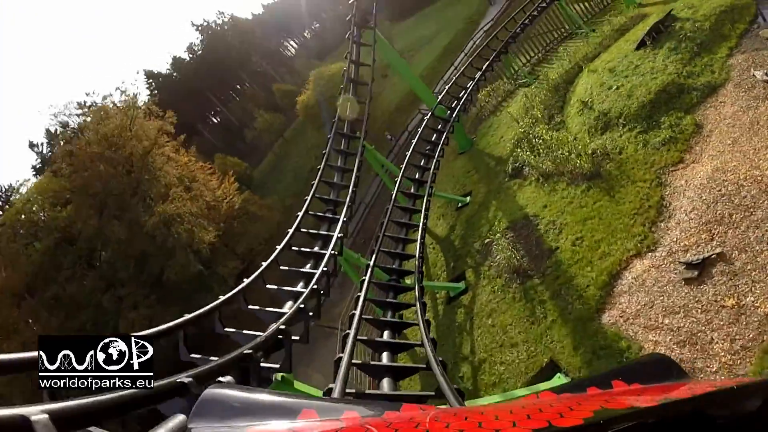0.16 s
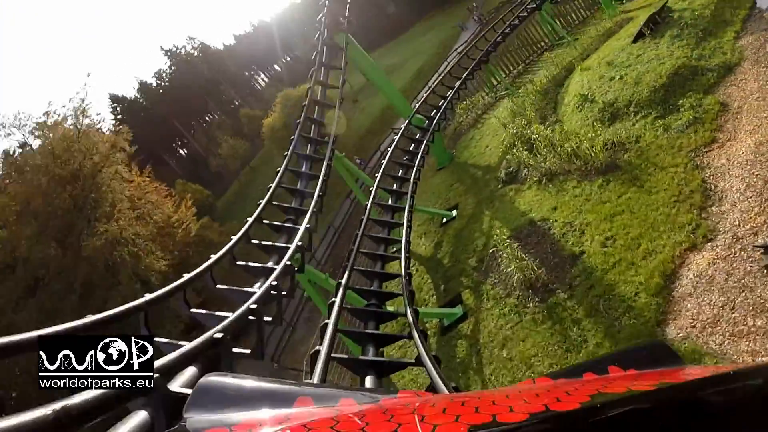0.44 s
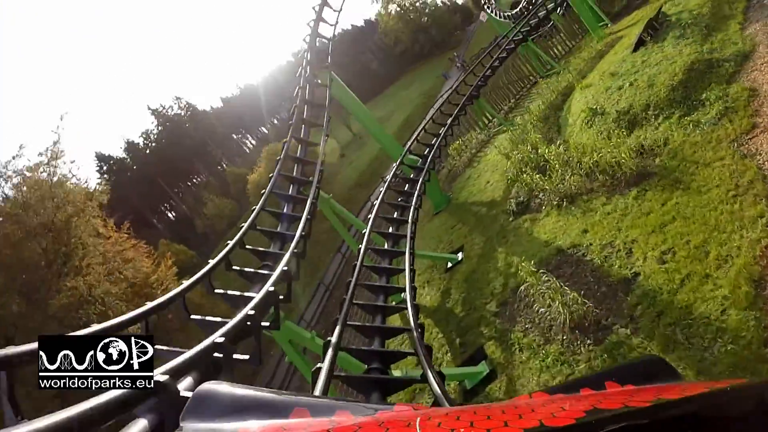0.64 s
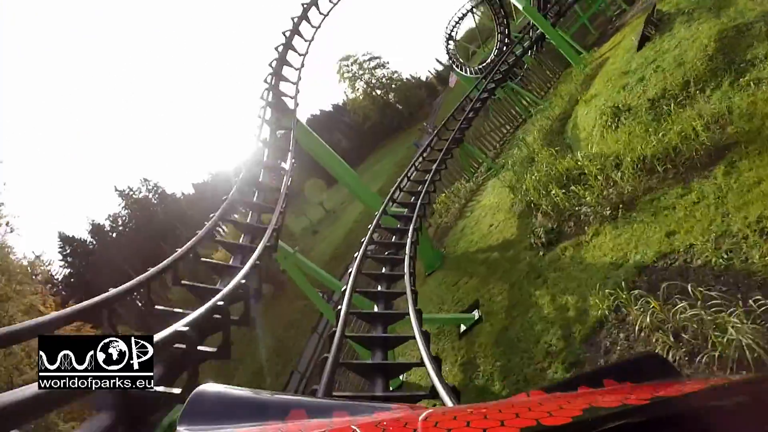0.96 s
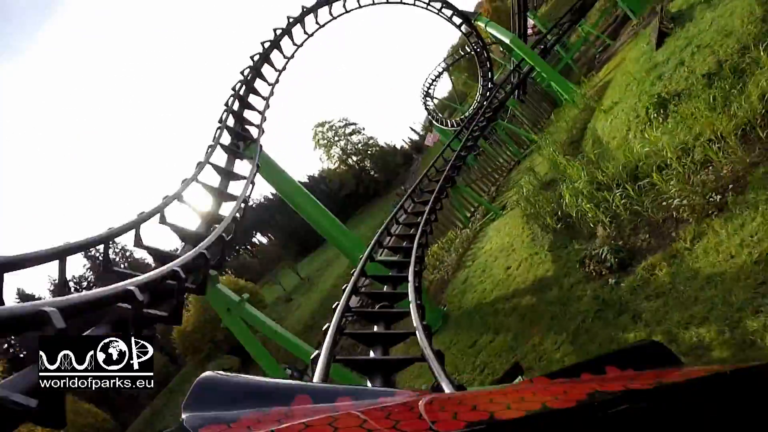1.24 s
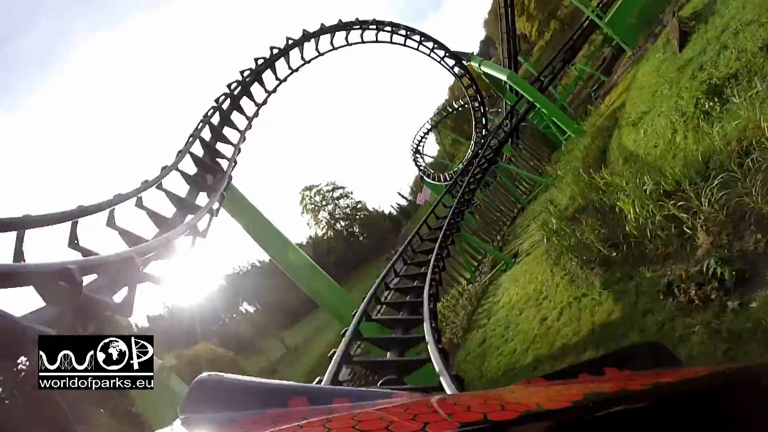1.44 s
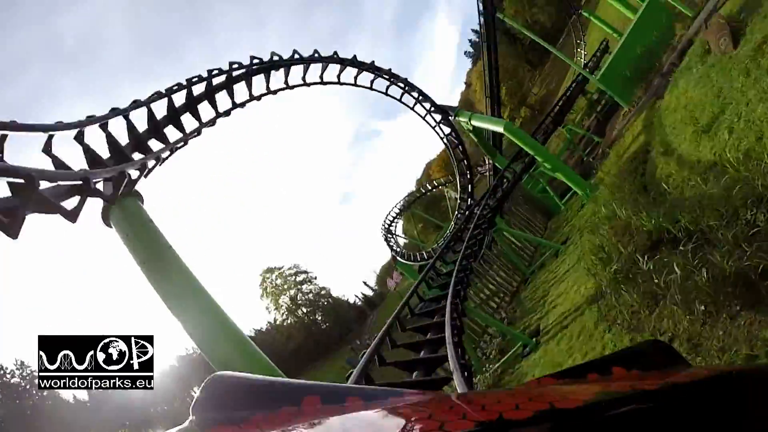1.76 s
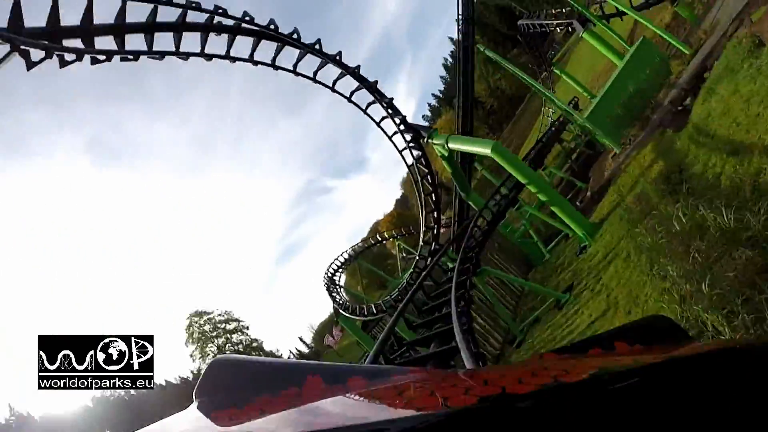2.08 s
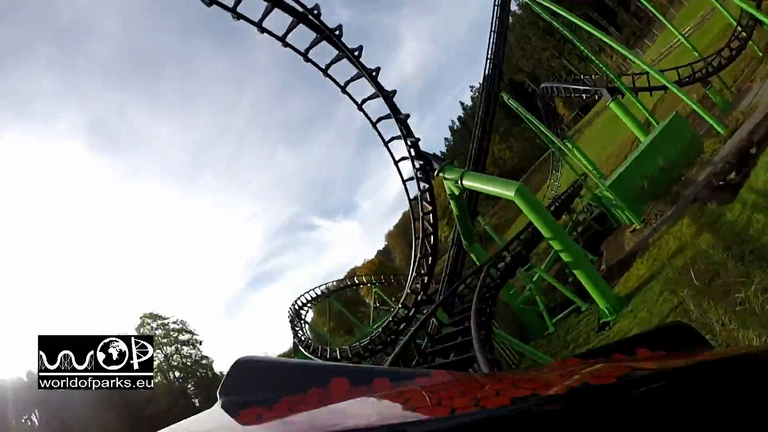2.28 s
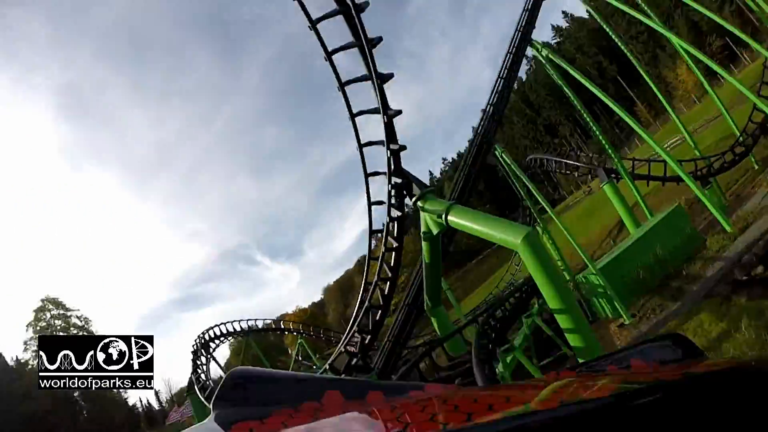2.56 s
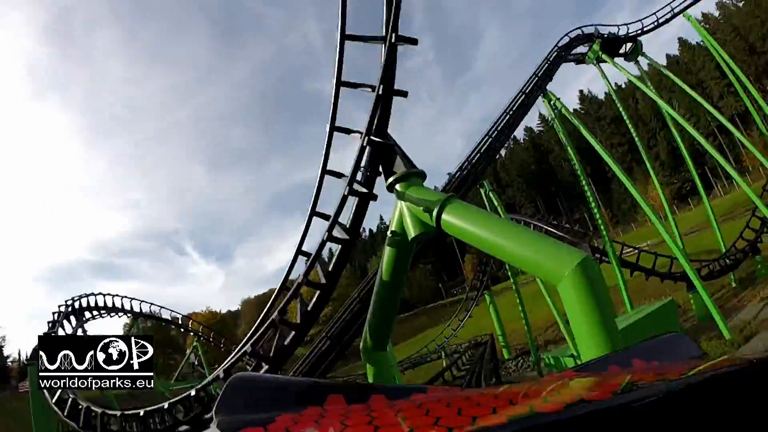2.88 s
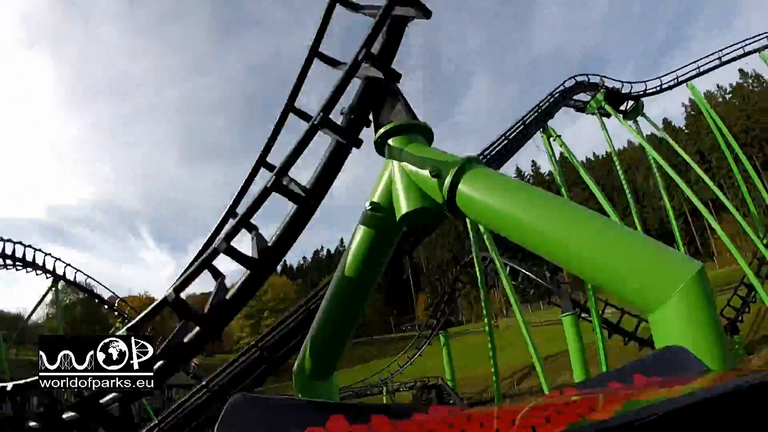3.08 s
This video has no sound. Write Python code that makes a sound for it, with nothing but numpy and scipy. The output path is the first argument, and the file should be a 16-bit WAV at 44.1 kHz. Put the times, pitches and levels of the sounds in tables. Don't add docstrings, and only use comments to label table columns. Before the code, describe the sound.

Close to the rails, a coaster car's wheels roar, tick and clatter under low buffeting wind; the ride grows louder, slams sharply, then a valve hisses behind while booming gusts overload the microphone.

```python
import sys
import numpy as np
from scipy import signal
from scipy.io import wavfile
from scipy.ndimage import uniform_filter1d

SR = 44100
rng = np.random.default_rng(int(sys.argv[2]) if len(sys.argv) > 2 else 0)


def elevation(decibels):
    levels = np.asarray(decibels, float)
    return 10 ** (levels / 20)


def transcribe(signal):
    frames = np.atleast_2d(signal).T
    limited = np.clip(frames, -1, 1)
    pcm = np.round(limited * 32767).astype(np.int16)
    wavfile.write(sys.argv[1], SR, pcm)


N = 142002

# time in seconds, level in dB.
GUST = [(0.0, -23), (0.28, -17.5), (0.35, -25.5), (0.46, -16.5), (0.47, -18.5), (0.91, -24.5), (0.99, -17),
        (1.31, -20), (1.33, -14), (2.35, -22.5), (2.41, -20), (2.45, -22), (2.69, -13), (2.84, -15.5),
        (2.9, -6.5), (3.16, -20), (3.18, -7), (3.22, -26)]
# frequency in Hz, density in dB per Hz.
BUFFET = [(8.8, -12), (15, 2), (49, 1.5), (63, -4.5), (80, -9.5), (90, -12), (120, -74), (200, -120)]
# time in seconds, roar in dB, frame shake in dB, air rush in dB.
LOAD = [(0.0, -55.5, -38.5, 6), (0.39, -53.5, -32, 5), (0.49, -52.5, -34.5, 6), (0.96, -50, -33, 2.5),
        (1.11, -47.5, -33.5, 1), (1.25, -49, -32.5, 2.5), (1.6, -45.5, -28.5, 1.5), (1.71, -46, -28.5, -1),
        (2.16, -46, -31, 0.5), (2.35, -45, -26, -3.5), (2.65, -44, -29, -7), (2.82, -43, -26.5, -20),
        (2.94, -43, -33, -9), (3.22, -48, -24.5, -8)]
# frequency in Hz, density in dB per Hz.
FRAME = [(41, -3), (70, -7), (80, -20.5), (120, -4), (263, -30), (458, -31.5), (538, -33), (958, -41.5),
         (1100, -33), (1430, -89), (2420, -120)]
# frequency in Hz, density in dB per Hz.
ROAR = [(700, -19), (1100, -1.5), (1500, 2.5), (2600, -4.5), (4000, -12.5), (6000, -20.5), (9000, -26),
        (15000, -54)]
# frequency in Hz, level in dB, t60 in seconds.
FITTINGS = [(1347, -1, 0.034), (1447, 5, 0.017), (1700, 3.5, 0.047), (1820, -4, 0.04), (2283, 0.5, 0.011),
            (2530, -14.5, 0.019), (2730, -13, 0.014)]
# peak in seconds, rise in seconds, fall in seconds, level in dB.
JOLTS = [(.015, 0.0083, 0.026, -42), (.445, 0.01, 0.043, -43.5), (1.19, 0.005, 0.083, -52),
         (1.65, 0.016, 0.011, -49.5), (1.885, 0.031, 0.018, -43.5), (2.16, 0.019, 0.067, -43.5),
         (2.505, 0.0038, 0.013, -42), (2.6, 0.0048, 0.0055, -46.5), (2.69, 0.025, 0.015, -44),
         (2.95, 0.0089, 0.022, -56), (3.2, 0.085, 0.013, -42)]
# frequency in Hz, density in dB per Hz.
JOLT_COLOUR = [(100, 25), (300, 16), (800, 3.5), (1500, 7.5), (2900, -2), (3300, -3.5), (6000, -19),
               (14000, -58)]
# peak in seconds, rise in seconds, fall in seconds, level in dB.
SLAM = [
    (2.352, .008, .012, -38),
    (2.37, .012, .015, -34.5),
    (2.388, .008, .025, -34),
    (2.459, .002, .006, -40),
    (.44, .008, .03, -44),
    (.505, .003, .008, -43),
    (3.19, .03, .03, -43),
]
# peak in seconds, rise in seconds, fall in seconds,
# level in dB.
SCUFFS = [
    (2.358, .012, .03, -50),
    (2.1, .02, .015, -63),
    (2.43, .01, .01, -57),
    (2.585, .016, .08, -50),
]
# frequency in Hz, density in dB per Hz.
SCUFF_COLOUR = [(3000, -6), (4000, 0), (6500, 0), (9000, -10), (15000, -22)]
# time in seconds, width in seconds, peak in dB.
SHOVES = [
    (2.4092, .005, -1),
    (.44, .007, -10),
    (2.704, .005, -8),
]
# start in seconds, peak in dB, pitch in Hz.
THUDS = [(0.021, -20, 132), (0.445, -31, 96.9), (0.739, -14, 98), (0.988, -31, 118), (1.189, -16.5, 158),
         (1.37, -16, 116), (1.439, -14, 99), (1.65, -24, 97), (1.718, -16, 95), (1.764, -13.5, 99),
         (1.88, -20, 96), (2.083, -37, 142), (2.158, -15, 121), (2.273, -25, 108), (2.689, -10, 132),
         (2.728, -28, 101), (2.891, -21, 100), (3.03, -8.5, 128), (3.081, -14.5, 123)]
# frequency in Hz, level in dB, t60 in seconds.
KNOCK = [(135, -14, .045), (330, -22, .025), (600, -27, .02), (1650, -27, .02), (2300, -33, .035)]
# start in seconds, peak in dB, brightness in dB.
TICKS = [(0.1433, -35.5, -16), (0.4296, -33, -16), (0.5038, -42, -14), (0.81, -50, -26), (1.887, -41, -13),
         (2.0561, -37.5, -27), (2.147, -40, -18), (2.2532, -42, -28), (2.35, -42.5, -23), (2.362, -38, -25),
         (2.374, -35, -28), (2.386, -34, -30), (2.485, -47, -35)]
# frequency in Hz, level in dB, t60 in seconds.
TICK_MODES = [(1360, -10, 0.022), (1720, -5, 0.019), (2260, -6, .01), (2600, -1, 0.02)]
# start in seconds, frequency in Hz, level in dB, t60 in seconds.
PINGS = [
    (0.031, 404, -35, 0.23),
    (.445, 650, -33, 0.13),
    (.445, 370, -37.5, 0.22),
    (1.1781, 960, -35, 0.096),
    (3.025, 915, -37.5, 0.073),
]
# peak in seconds, frequency in Hz, level in dB.
CLINKS = [(.81, 2600, -48), (.94, 1500, -39), (1.245, 5900, -57), (1.262, 5900, -58), (1.28, 5900, -62),
          (1.315, 1600, -38.5), (1.528, 1350, -40), (2.161, 2600, -41), (2.6, 2600, -41), (2.64, 2500, -35),
          (2.761, 1600, -32.5), (2.857, 1550, -30), (2.858, 2300, -35), (2.942, 2250, -31.5),
          (2.978, 1700, -28), (2.983, 2700, -26.5), (2.997, 1600, -34), (3.12, 2700, -40),
          (3.17, 2600, -32.5), (3.17, 1600, -31), (3.2, 1300, -29), (3.207, 2600, -33.5)]
# frequency in Hz, density in dB per Hz.
VENT = [(2000, -37), (2600, -13), (3100, 1), (4500, 2), (6100, -2), (7200, -10), (8200, -14.5),
        (10000, -12), (15000, -33.5)]
# frequency in Hz, width in Hz, level in dB.
SLOT = (3730, 380, -8)
# frequency in Hz, width in Hz, level in dB.
HOUSING = [(1155, 496, -6), (1600, 310, -0.5), (1840, 330, -2.5), (2560, 250, 1.5), (3540, 970, -3),
           (4100, 750, 0.5), (4830, 190, -2.5), (5970, 340, 3), (8130, 1280, -6), (10150, 720, 3)]


def wind():
    gust_db, = in_time(GUST)
    boom = resonance(50.83, t60=0.13)
    flow = rms_one(coloured(BUFFET, shared_db=0, own_db=0) + elevation(-3) * boom)
    evenness = 0.7
    return elevation(gust_db + 2.27) * flow / np.sqrt(uniform_filter1d(flow ** 2, size=3000) + evenness)


def wheels():
    roar_db, shake_db, rush_db = in_time(LOAD)
    roar = coloured(ROAR, shared_db=.5, own_db=1.5, grains=rattles()) + squeal() + elevation(-6) * chatter()
    roar = roar + (elevation(rush_db) - 1) * filtered(roar, 2, 3400, "high")

    gust_db, = in_time(GUST)
    shake_db = shake_db + 0.6 * (gust_db - uniform_filter1d(gust_db, size=20000))
    frame = coloured(FRAME, shared_db=3.0, own_db=2.0)
    frame = frame / np.sqrt(uniform_filter1d(frame ** 2, size=2500) + 0.34)
    return elevation(roar_db + 0.5) * roar + elevation(shake_db + 3.5) * frame


def rattles():
    per_s, spread_db, level_db = 440, 3, -8.5
    count = N + 8000
    sizes = elevation(spread_db * np.minimum(rng.exponential(1, count), 5)) * rng.choice([-1, 1], count)
    return elevation(level_db) * rms_one(sizes * (rng.random(count) < per_s / SR))


def squeal():
    width_hz = 20
    t60 = np.log(1000) / np.pi / width_hz
    return elevation(-19 + 2 * drift(10)) * resonance(1882, t60)


def chatter():
    per_s = 18
    force = elevation(3.3 * np.minimum(rng.exponential(1, N), 2)) * rng.choice([-1, 1], N)
    out = np.zeros(N)
    for hz, db, t60 in FITTINGS:
        knocked = rng.random(N) < per_s / SR
        out += ring(elevation(db) * force * knocked, hz, t60)
    return rms_one(out)


def jolts():
    clatter = swells(JOLTS + [(2.39, .03, .03, -42)]) * coloured(JOLT_COLOUR, shared_db=0, own_db=.5)
    scuffs = swells(SCUFFS) * coloured(SCUFF_COLOUR, shared_db=-1.0, own_db=3.5)
    slam = swells(SLAM) * rms_one(filtered(rng.standard_normal(N), 5, [500, 3050], "band"))
    return elevation(9) * clatter + scuffs + slam


def shoves():
    t, out = np.arange(N) / SR, np.zeros(N)
    for s, width, db in SHOVES:
        push = np.exp(-((t - s) / np.where(t < s, .38 * width, width)) ** 2)
        recoil = .35 * np.exp(-((t - s - 2.8 * width) / (1.6 * width)) ** 2)
        out += elevation(db) * (push - recoil)
    return out


def thuds():
    out = np.zeros(N)
    for s, db, hz in THUDS:
        out += ring(click(s, db - 2.5), hz, t60=0.1)
    out = filtered(out, 2, 250, "low")
    for hz, db, t60 in KNOCK:
        out += elevation(db) * ring(click(2.4575, 0), hz, t60)
    return out


def joints():
    s, db, bright_db = np.transpose(TICKS)
    strengths_db = rng.normal(0, 2, (len(TICKS), len(TICK_MODES)))
    smear = np.exp(-1 / (0.0018 * SR))
    out = np.zeros(N)
    for k, (hz, mode_db, t60) in enumerate(TICK_MODES):
        clicks = click(s, db + mode_db + 5.0 + strengths_db[:, k])
        crack = np.sqrt(1 - smear ** 2) * signal.lfilter([1], [1, -smear], clicks)
        out += ring(crack * rng.choice([-1, 1], N), hz, t60)
    fade = np.exp(-1 / (0.003 * SR))
    out += signal.lfilter([1], [1, -fade], click(s, db + bright_db)) * rng.standard_normal(N)
    return filtered(out, 3, 1100, "high")


def pings():
    return sum(ring(click(s, db), hz, t60) for s, hz, db, t60 in PINGS)


def clinks():
    t = np.arange(N) / SR
    shake = 0.36 * drift(150)
    out = np.zeros(N)
    for s, hz, db in CLINKS:
        blip = swells([(s, 0.0024, 0.0048, db)])
        out += blip * np.sin(2 * np.pi * hz * t + shake)
    return out


def valve():
    t = np.arange(N) / SR
    open_s, rise_s = 2.615, .04
    since = np.maximum(t - open_s - .08, 0)
    jet = coloured(VENT, shared_db=.3, own_db=.7) + elevation(-8) * resonance(3040, t60=0.0035)
    jet = shaped(jet, *SLOT)

    top_db = np.clip((t - 3.07) * 10, 0, 1) - 30 * since
    top = elevation(top_db) * filtered(jet, 4, 7900, "high")
    low = filtered(jet, 4, 7900, "low")
    edge = signal.sosfiltfilt(signal.butter(2, 7400, "high", fs=SR, output="sos"), low)
    low = low + (elevation(-29 * np.maximum(t - 2.7, 0)) - 1) * edge

    fall_db = -2.5 * np.clip((t - 3.05) * 10, 0, 1) - 3 * since
    opening = np.clip((t - open_s) / rise_s, 0, 1)
    return elevation(-35 + fall_db) * opening * (low + top)


def rms_one(x):
    return x / np.sqrt(np.mean(x ** 2) + 1e-20)


def in_time(rows):
    s, *columns = np.transpose(rows)
    return [np.interp(np.arange(N) / SR, s, c) for c in columns]


def filtered(x, order, hz, kind):
    return signal.sosfilt(signal.butter(order, hz, kind, fs=SR, output="sos"), x)


def click(s, db):
    out = np.zeros(N)
    out[(np.asarray(s) * SR).astype(int)] = elevation(db)
    return out


def drift(rate):
    r = np.exp(-80 * np.pi * rate / SR)
    slow = signal.lfilter([1], [1, -2 * r, r * r], rng.standard_normal(N // 40 + 2002))[2000:]
    return np.interp(np.arange(N) / 40, np.arange(len(slow)), rms_one(slow))


def ring(clicks, hz, t60):
    r, w = elevation(-60 / (t60 * SR)), 2 * np.pi * hz / SR
    return signal.lfilter([0, np.sin(w)], [1, -2 * r * np.cos(w), r * r], clicks + 1e-18)


def resonance(hz, t60):
    return rms_one(ring(ring(rng.standard_normal(N), hz, t60), hz, t60))


def coloured(spectrum, shared_db, own_db, grains=0):
    hz, db = np.transpose(spectrum)
    edges = hz[0] * 2 ** np.arange(0, np.log2(hz[-1] / hz[0]) + .1, 1 / 3)
    together = drift(9)
    white = rng.standard_normal((2, N + 8000)) + grains
    out = 0
    for k, (low, high) in enumerate(zip(edges, edges[1:])):
        band = filtered(white[k % 2], 2, [low, high], "band")[8000:]
        level_db = np.interp(np.log(low * high) / 2, np.log(hz), db)
        out = out + elevation(level_db + shared_db * together + own_db * drift(13.0)) * band
    return rms_one(out)


def swells(rows):
    t, out = np.arange(N) / SR, np.zeros(N)
    for s, rise, fall, db in rows:
        before, after = np.exp(-((t - s) / rise) ** 2), np.exp(-np.abs(t - s) / fall)
        out += elevation(db) * np.where(t < s, before, after)
    return out


def shaped(x, hz, width, db):
    w, a, q = 2 * np.pi * hz / SR, elevation(db / 2), np.pi * width / SR
    turn = -2 * np.cos(w)
    return signal.lfilter([1 + q * a, turn, 1 - q * a], [1 + q / a, turn, 1 - q / a], x)


def scene():
    mid = wind() + wheels() + jolts() + shoves() + thuds() + joints() + pings() + clinks() + valve()
    late = np.concatenate([np.zeros(300), mid[:-300]])
    body = filtered(late, 2, [60, 3000], "band")
    top = filtered(late, 4, 12000, "high")
    chance = drift(21.0)
    side = elevation(-17) * np.clip(2 * (chance - 1.3), 0, 1) * body
    side = side + elevation(-13) * np.clip(2 * (chance - .6), 0, 1) * top
    return np.array([mid + side, mid - side])


def roll_off(x):
    return signal.sosfilt(signal.butter(12, 15010, fs=SR, output="sos"), x)


def record(dry):
    x = dry
    for hz, width, db in HOUSING:
        x = shaped(x, hz, width, db)
    x = np.clip(x, -.98, .98)
    x = signal.sosfilt(signal.cheby2(14, 60, 15200, fs=SR, output="sos"), x)

    top = signal.sosfiltfilt(signal.butter(20, 12800, "high", fs=SR, output="sos"), x)
    loud = uniform_filter1d(top[0] ** 2, size=900) > elevation(2 * -85)
    shut = uniform_filter1d(1.0 * ((drift(25) > -.1) & ~loud), size=300)
    return roll_off(x - 1.1 * shut * top)


dry = scene()
out = record(dry)
transcribe(out)
```